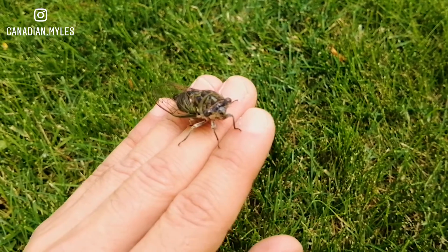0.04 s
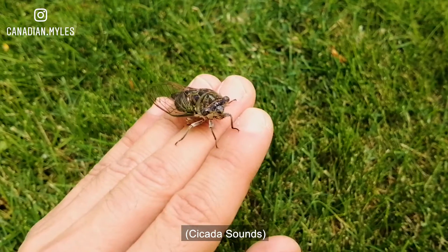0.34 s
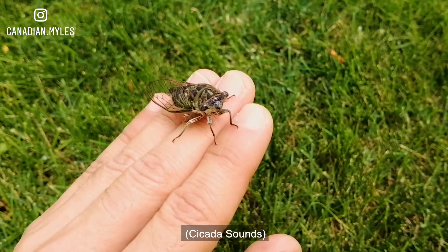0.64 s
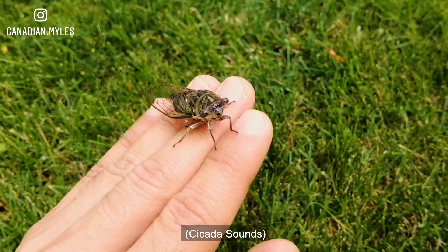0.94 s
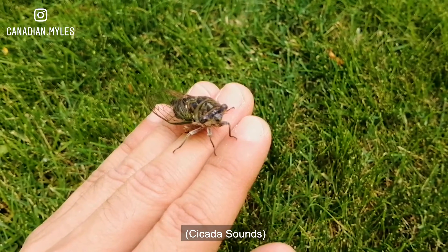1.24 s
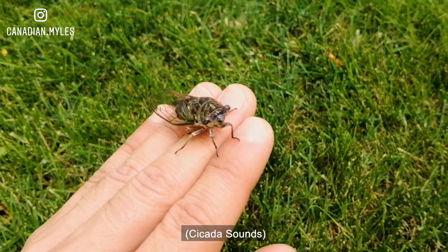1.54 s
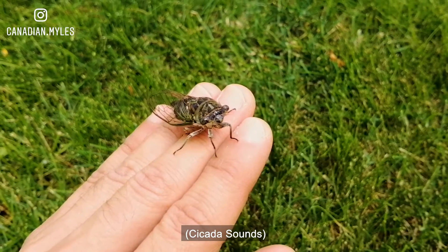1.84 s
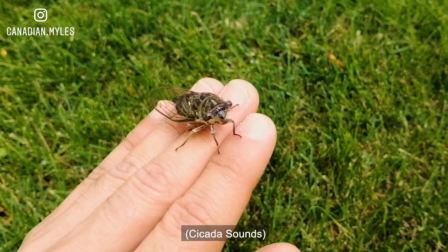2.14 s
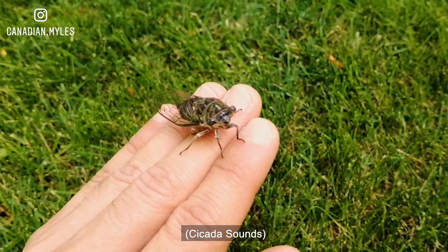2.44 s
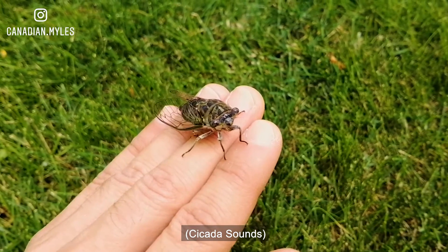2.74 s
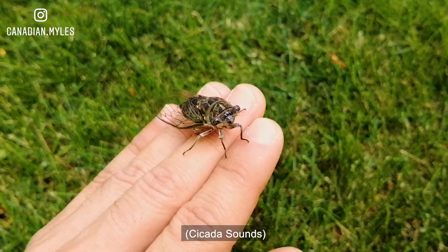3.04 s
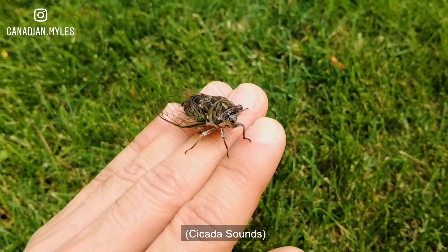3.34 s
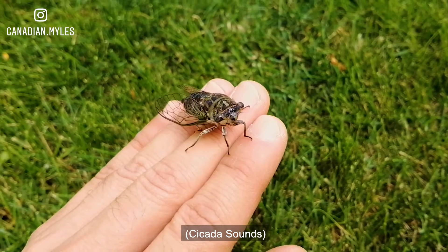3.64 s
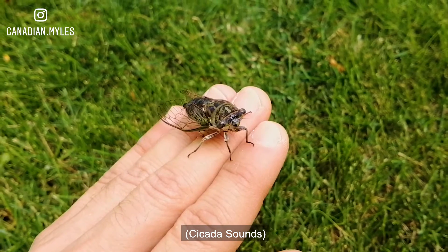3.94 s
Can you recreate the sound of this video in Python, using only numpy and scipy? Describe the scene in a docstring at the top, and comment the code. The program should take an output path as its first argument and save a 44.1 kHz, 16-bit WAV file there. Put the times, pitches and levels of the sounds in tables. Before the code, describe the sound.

A cicada close by clicks once at the very start and spins up within about 0.3 seconds into a shrill, continuous buzz. The buzz swells from 0.5 seconds, is loud by 2 seconds and holds through 4 seconds. A faint low hum grows under it from 1.5 seconds, and a few very soft taps come near 2 seconds. Soft hiss and faint outdoor rumble lie beneath throughout.

```python
"""A cicada on a hand, close by, clicks once, spins up and holds a loud buzz. Its two tymbals buckle in
turn: each snaps in with a strong click that rings the abdomen near 7 kHz, then springs out with a
weaker, brighter one. From 1.5 s a low hum at the click rate grows in; near 2 s come four soft taps.
Faint rustles come and go; soft hiss and an outdoor rumble lie beneath throughout."""
import sys
import numpy as np
from scipy import signal
from scipy.fft import rfft, irfft
from scipy.io import wavfile
from scipy.ndimage import uniform_filter1d, map_coordinates

SR = 44100
rng = np.random.default_rng(int(sys.argv[2]) if len(sys.argv) > 2 else 0)


def pcm_store(signal):
    """Save signal as 16-bit PCM."""
    levels = np.round(np.clip(np.atleast_2d(signal), -1, 1) * 32767)
    wavfile.write(sys.argv[1], SR, levels.astype(np.int16).T)


N = 176400

# snap rate, both tymbals together: t/s, rate/Hz
SNAP_RATE_HZ = [(.04, 145), (.075, 172), (.11, 211), (.15, 255), (.19, 290), (.28, 309), (.4, 320.5),
                (.5, 326.7), (.62, 331.2), (.75, 333.1), (1, 335.3), (1.25, 337.25), (1.7, 339.6),
                (2.25, 340.75), (3, 342.3), (4, 344)]
# lag of tymbal 2 against an even beat: t/s, lag/ms
SKEW_MS = [(.05, .37), (.14, .2), (.25, .15), (.55, -.014), (1.35, -.015), (2.3, -.019), (2.6, .001),
           (2.9, .012), (3.2, .031), (3.6, .043), (4, .064)]
# snap-in to spring-out, tymbal 1: t/s, delay/ms
RETURN_MS = [(.05, 1.74), (.55, 1.774), (.8, 1.741), (1.05, 1.724), (1.35, 1.598), (2, 1.593), (2.3, 1.58),
             (2.6, 1.545), (2.9, 1.533), (3.2, 1.506), (3.6, 1.48), (4, 1.454)]
# snap timing scatter: t/s, sigma/us
JITTER_US = [(.05, 29), (.3, 7), (.6, 2.4), (1.5, 2.6), (2.5, 2.2), (3.412, 2), (3.423, 30), (3.434, 2.2),
             (4, 2.2)]
# body ring at tension factor 1, per click and tymbal: f/Hz, in 1/dB, in 2/dB, out 1/dB, out 2/dB
RING_DB = [(3200, -45.5, -40, -43.5, -48), (4720, -27.5, -25.5, -43, -34), (4880, -10, -9.5, -19.5, -10),
           (5280, -13.5, -8.5, -14, -21), (6040, 1, 2, -8, -6), (6500, -3.5, -2, -15.5, -15),
           (6745, 1.65, 3, -7.7, -6), (7340, 7.5, 6, -14.5, -3), (7790, -5, -4, -8, -7.5),
           (8350, -14, -15, -7, -12.5), (9065, -13.5, -10.5, -5, -0.5), (9570, -8, -9, -3, -4.5),
           (10000, -31, -26.5, -21, -9.5), (10560, -15, -15, -7.5, -17), (11540, -11.5, -12.5, -27.5, -23),
           (12640, -8, -11, -17, -21), (13730, -8.5, -35, -37, -38), (14140, -29, -42, -47, -28),
           (15100, -36.5, -59.5, -57, -59)]
# body tension: t/s, factor on ring frequencies
TENSION_FACTOR = [(0, .973), (.8, .975), (1.65, .98), (2.3, .986), (2.6, .997), (3.2, 1.005), (4, 1.009)]
# click strength: t/s, inward level/dB, outward re inward/dB, left minus right/dB
EFFORT_DB = [(.05, -8.5, -4.5, 8.5), (.09, -14, 5.5, 0.5), (.23, -12.5, -0.5, 1.5), (.39, -12.5, 2, 2),
             (.55, -5.5, -1.2, 1.5), (.77, -5, 0.2, 1.5), (1.05, -1.5, -0.5, 2.5), (1.65, 0.4, 0, 2.5),
             (2, 2.5, 0.5, 5.5), (2.3, 2.5, 0, 4), (2.6, 3, -0.5, 5.5), (2.85, 4.5, -1, 5.5),
             (3.2, 3, -2, 5.5), (3.6, 3.5, -2.5, 5), (4, 4, -2, 5.5)]
# buzz treble: t/s, gain above 10 kHz/dB, further gain above 12 kHz/dB
TREBLE_DB = [(.05, 0, 2), (.14, 4.5, 4), (.4, 9, -2.5), (.55, -4.5, 4.5), (1.05, -1.5, 2), (1.65, -8, 7),
             (2, -9.5, 5), (2.6, -9.2, -5), (2.9, -9, -7.6), (3.2, -7.5, -19), (4, -11, -12)]
# hum envelope: t/s, level/dB
HUM_LEVEL_DB = [(0, -87), (1.0, -88.5), (1.5, -79), (1.8, -65.5), (2.1, -56), (2.5, -52.5), (2.85, -48.5),
                (3.5, -48), (4, -47)]
# hum spectrum: f/Hz, level/dB
HUM_SPECTRUM_DB = [(120, 7.5), (172, 8.5), (260, -11), (343, -8), (515, 7), (686, 5), (860, -9.5),
                   (1030, -1.5), (1200, 4.5), (1370, -1.5), (1545, -11), (1715, 1), (1890, 1),
                   (2060, -10.5), (2400, -1), (2750, -7), (3100, -4), (3600, -8.5), (3950, -22.5),
                   (4300, -13.5), (4650, -9.5), (5500, -21.5)]
# upper hum overtones: t/s, gain/dB
HUM_BRIGHT_DB = [(0, 6), (1.2, 11.5), (1.9, 4), (2.3, 14), (2.7, 11.5), (3.2, 7.5), (4, 5.5)]
# stereo colour, about half applied to each side: f/Hz, left minus right/dB
BALANCE_DB = [(150, 15), (350, 6), (690, 2), (1270, -6), (2340, -1), (4300, -2), (5200, -3.94), (6000, -1),
              (7200, -4.5), (8200, -0.1), (9200, -2.3), (10000, -8.5), (10900, -18.5), (12800, -10.5),
              (14200, .5)]
# lead of the left microphone: t/s, lead/ms
LEAD_MS = [(0, 0.12), (2, 0.12), (3.2, 0.11), (4, 0.11)]
# taps on the hand: t/s, level/dB
TAP_EVENTS = [(1.973, -58), (1.995, -51.5), (2.017, -56), (2.066, -60)]
# tap spectrum: f/Hz, level/dB
TAP_SPECTRUM_DB = [(100, -17), (250, -7), (370, 9), (600, -5), (1000, -5), (2500, -26)]
# rustles: peak t/s, 1/e half-length/s, centre f/Hz, level/dB
RUSTLE_EVENTS = [(.69, .064, 940, -69), (1.437, .023, 1840, -71), (2.21, .03, 3820, -66),
                 (3.433, .025, 1500, -67), (3.423, .011, 2900, -61), (2.7, .06, 3830, -68)]
# hiss spectrum: f/Hz, level/dB
HISS_SPECTRUM_DB = [(3500, -69), (4900, -24), (5800, -6.5), (7000, -5), (8500, -4.5), (10000, -12.5),
                    (12000, -18), (13200, -28), (15000, -40)]
# outdoor noise, before the split into rumble and air: f/Hz, level/dB
OUTDOOR_SPECTRUM_DB = [(25, -5), (60, 0), (100, -2), (135, 1), (170, -5.5), (215, -3.5), (300, -10),
                       (500, -10.5), (1000, -7), (2000, -11.5), (3500, -19), (8000, -73), (15000, -18)]
# rumble envelope: t/s, level/dB
RUMBLE_LEVEL_DB = [(0, -52), (.3, -59.5), (.9, -57.5), (1.2, -61.5), (2, -67.5), (2.6, -72.5), (4, -71)]
# air envelope: t/s, level/dB
AIR_LEVEL_DB = [(0, -59), (.5, -65), (1.5, -68), (2.5, -65), (4, -66)]


def cicada(t):
    """Tymbal clicks ring the tensing body; main ring and hum swell while the treble recedes."""
    snap_s, spring_s, snap_gain, spring_gain, tymbal = buckling(t)
    clock_s = np.cumsum(curve(TENSION_FACTOR, t)) / SR  # a tenser body rings on a faster clock
    ring = body_ring(np.interp(snap_s, t, clock_s), snap_gain, tymbal, column=1)
    ring += body_ring(np.interp(spring_s, t, clock_s), spring_gain, tymbal, column=3)
    ring = np.array([map_coordinates(side, [clock_s * SR], order=5) for side in ring])
    main, upper = split(ring, hz=10000)
    treble, sizzle = split(upper, hz=12000)
    sizzle *= undb(curve(TREBLE_DB, t, column=2))
    buzz = main + undb(curve(TREBLE_DB, t)) * (treble + sizzle)
    pan_db = curve(EFFORT_DB, t, column=3)
    left, right = buzz * undb(np.array([pan_db, -pan_db]) / 2) + low_hum(t, snap_s, tymbal)
    return np.array([colour(left, BALANCE_DB, share=.48), colour(right, BALANCE_DB, share=-.54)])


def buckling(t, opening_s=.02, opening_boost_db=6, start_s=.0411, second_hold_ms=.17, sigma_db=.3):
    """Two tymbals snap in and spring out in turn: click times, gains and tymbal index (0, 1)."""
    wobble = np.interp(t, np.linspace(0, t[-1], 120), rng.standard_normal(120))
    rate_hz = curve(SNAP_RATE_HZ, t) * (1 + .0004 * wobble) * (t >= start_s)
    count = np.cumsum(rate_hz) / SR
    beat_s = np.r_[opening_s, start_s, np.interp(np.arange(1, int(count[-1]) + 1), count, t)]
    tymbal = 1 - np.arange(len(beat_s)) % 2
    tymbal[0] = 0
    chance = rng.standard_normal((len(beat_s), 4)).T
    jitter_s = curve(JITTER_US, beat_s) / 1e6
    snap_s = beat_s + tymbal * curve(SKEW_MS, beat_s) / 1000 + jitter_s * chance[0]
    hold_ms = curve(RETURN_MS, beat_s) + tymbal * second_hold_ms
    spring_s = snap_s + hold_ms / 1000 + 1.5 * jitter_s * chance[1]
    level_db = curve(EFFORT_DB, beat_s) + sigma_db * chance[2:]  # rows: inward, outward
    level_db[1] += curve(EFFORT_DB, beat_s, column=2)
    level_db[:, 0] += opening_boost_db
    snap_gain, spring_gain = undb(level_db)
    return snap_s, spring_s, snap_gain, spring_gain, tymbal


def body_ring(times_s, gains, tymbal, column):
    """Each tymbal rings the body with its own spectrum."""
    trains = [stereo_clicks(times_s[tymbal == k], gains[tymbal == k]) for k in range(2)]
    return colour(trains[0], RING_DB, column) + colour(trains[1], RING_DB, column + 1)


def low_hum(t, snap_s, tymbal, second_lag_ms=.028, second_db=-1.0):
    """Each inward snap also pumps the air: a low hum at the click rate."""
    pump_s = snap_s + tymbal * second_lag_ms / 1000
    pumps = stereo_clicks(pump_s, undb(second_db * tymbal), lead_share=.78)
    hum = steady(colour(pumps, HUM_SPECTRUM_DB))
    _, hum = split(hum, hz=100)
    low, high = split(hum, hz=4320)
    return (low + high * undb(curve(HUM_BRIGHT_DB, t))) * undb(curve(HUM_LEVEL_DB, t))


def taps(t, decay_s=.008):
    """Dull, quickly dying taps on the hand."""
    envelope = sum(undb(db) * (t >= s) * np.exp(-np.abs(t - s) / decay_s) for s, db in TAP_EVENTS)
    thud = colour(rng.standard_normal(N), TAP_SPECTRUM_DB)
    return envelope * thud / thud.std()


def rustles(t):
    """Short, soft swells of narrow-band noise."""
    swells = np.zeros(N)
    for peak_s, half_s, hz, db in RUSTLE_EVENTS:
        band = signal.butter(2, hz * np.exp([-.11, .11]), "band", fs=SR, output="sos")
        noise = signal.sosfilt(band, rng.standard_normal(N))
        swells += noise / noise.std() * undb(db) * np.exp(-((t - peak_s) / half_s) ** 2)
    return swells


def hiss(t, start_db=-46.5, rise_db_per_s=1):
    """Soft high hiss, slowly rising, independent on each side."""
    noise = colour(rng.standard_normal((2, N)), HISS_SPECTRUM_DB)
    return noise / noise.std() * undb(start_db + rise_db_per_s * t)


def outdoors(t):
    """A fading low rumble and faint, wider airy noise."""
    low, high = split(colour(rng.standard_normal((2, N)), OUTDOOR_SPECTRUM_DB), hz=340, order=2)
    rumble = spread(low, width=.42) * undb(curve(RUMBLE_LEVEL_DB, t))
    air = spread(high, width=1) * undb(curve(AIR_LEVEL_DB, t))
    return rumble + air


def stereo_clicks(times_s, gains, lead_share=1):
    """Clicks reach the left microphone just before the right."""
    lead_s = lead_share * curve(LEAD_MS, times_s) / 1000
    return np.array([clicks(times_s, gains), clicks(times_s + lead_s, gains)])


def clicks(times_s, gains):
    """Windowed-sinc pulses placed between samples."""
    centre = times_s[:, None] * SR
    index = np.floor(centre).astype(int) + np.arange(-7, 9)
    pulse = np.sinc(index - centre) * np.cos(np.pi * (index - centre) / 16) ** 2
    inside = (index >= 0) & (index < N)
    return np.bincount(index[inside], (pulse * gains[:, None])[inside], N)


def colour(x, rows, column=1, share=1):
    """Minimum-phase filter from an f/Hz, level/dB outline; share scales the dB."""
    rows, size = np.array(rows, float), 2 * N
    hz = np.maximum(np.arange(N + 1) * SR / size, 1)
    gain_db = share * np.interp(np.log(hz), np.log(rows[:, 0]), rows[:, column])
    cepstrum = irfft(np.log(undb(gain_db)))
    cepstrum[1:N] *= 2
    cepstrum[N + 1:] = 0
    return irfft(rfft(x, size) * np.exp(rfft(cepstrum)))[..., :N]


def split(x, hz, order=4):
    """Parts below and above hz."""
    low = signal.sosfiltfilt(signal.butter(order, hz, fs=SR, output="sos"), x)
    return low, x - low


def steady(pair, settle_s=.07):
    """Level to running rms 1; constant gain before settle_s."""
    power = uniform_filter1d(np.mean(pair ** 2, axis=0), size=3000)
    settled = int(settle_s * SR)
    power[:settled] = power[settled]
    return pair / np.sqrt(power + 1e-18)


def spread(pair, width):
    """Mid and side noise to left and right at rms 1."""
    mid, side = pair / pair.std()
    return (mid + width * np.array([side, -side])) / np.hypot(1, width)


def curve(rows, t, column=1):
    """Table column, linearly interpolated."""
    rows = np.array(rows, float)
    return np.interp(t, rows[:, 0], rows[:, column])


def undb(db):
    """dB to gain."""
    return 10 ** (np.asarray(db) / 20)


def scene():
    """Cicada over the outdoor background."""
    t = np.arange(N) / SR
    return cicada(t) + outdoors(t) + hiss(t) + taps(t) + rustles(t)


def record(dry):
    """Steep low-pass at 15.15 kHz."""
    return signal.sosfilt(signal.ellip(10, .2, 80, 15150, fs=SR, output="sos"), dry)


dry = scene()
out = record(dry)
pcm_store(out)
```